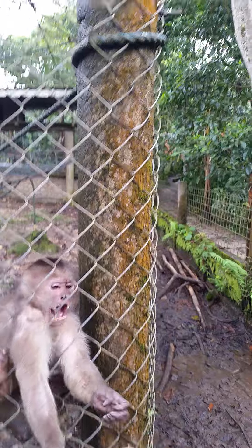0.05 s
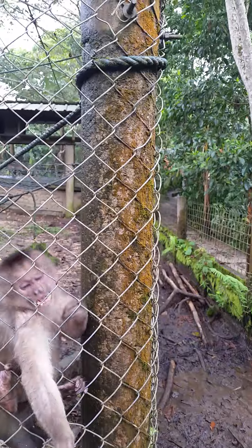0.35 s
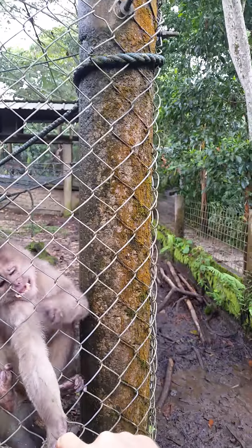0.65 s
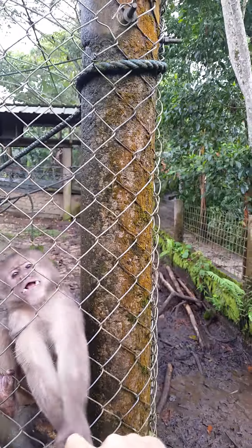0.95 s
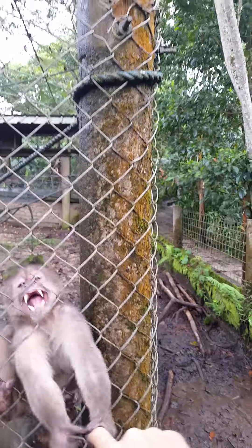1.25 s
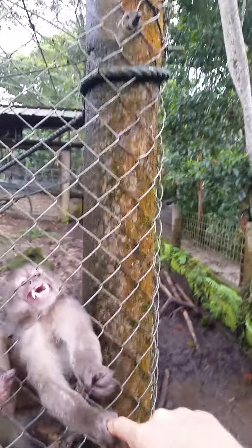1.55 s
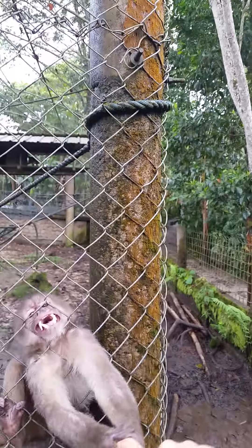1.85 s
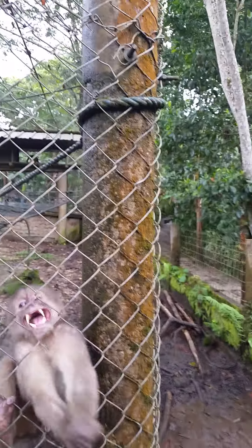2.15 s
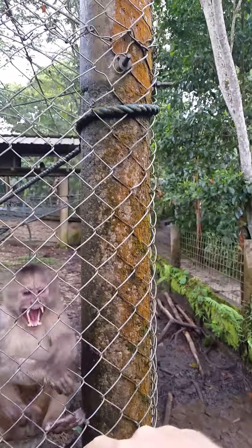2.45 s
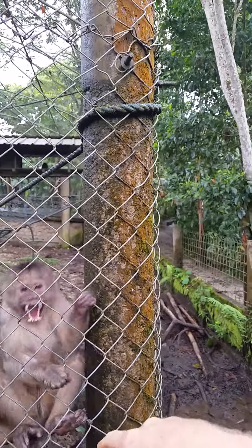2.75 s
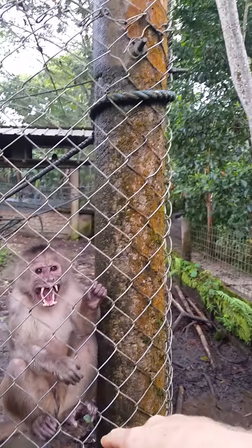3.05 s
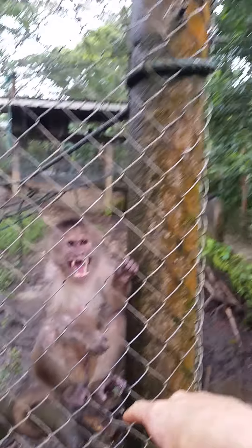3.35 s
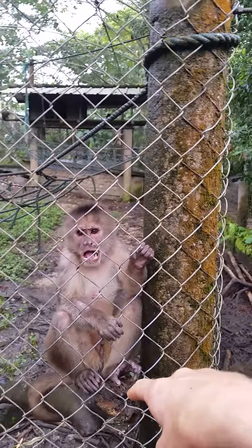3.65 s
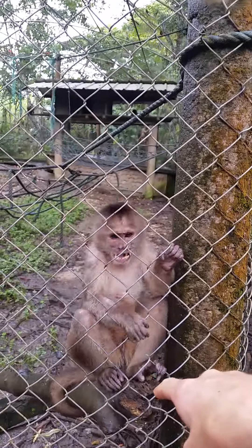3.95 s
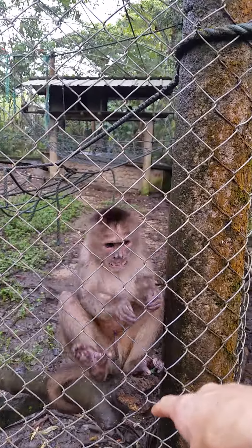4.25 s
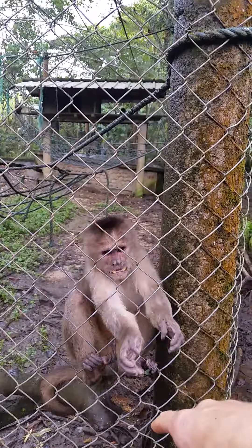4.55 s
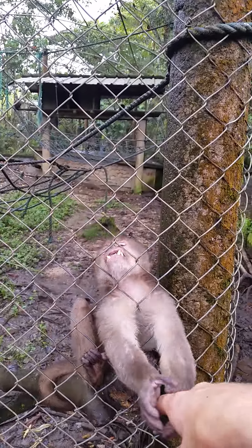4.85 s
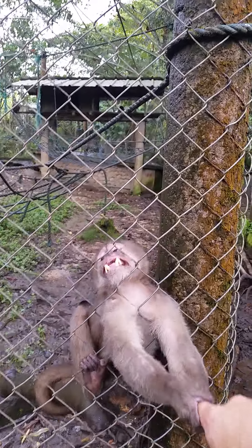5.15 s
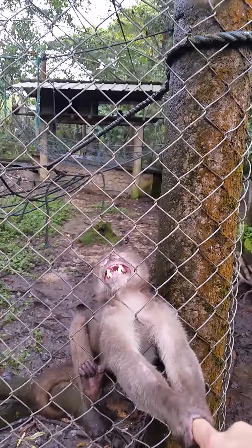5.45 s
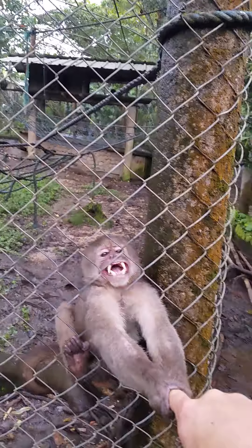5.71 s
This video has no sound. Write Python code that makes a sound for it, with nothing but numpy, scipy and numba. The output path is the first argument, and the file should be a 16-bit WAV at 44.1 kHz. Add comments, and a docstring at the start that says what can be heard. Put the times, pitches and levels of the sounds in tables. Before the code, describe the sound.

A monkey calls close to the microphone from behind a wire fence, outdoors, with a slight echo over a quiet hush and faint hum. It starts with thin, strained whines and hoarse, hissing screams until 0.5 seconds, and again around 1 second. Two short, loud barks come at about 1.4 and 1.55 seconds. Soft rustling and a little low wind rumble lead into a stronger scream from 2.1 to 2.6 seconds. Four sharp, high squeaks follow between 2.6 and 3.2 seconds, mixed with gritty scuffs and dull bumps at the fence and another scream. Softer screams come near 3.9 and 4.5 seconds, with thin, wavering whines running on to about 5.1 seconds. A harsh scream and a quieter bark around 5.2 seconds lead to one clear yelp, rising and falling, at 5.4 seconds. Brief high whines follow, and another scream begins near 5.8 seconds.

```python
"""A thin whine breaks into hoarse, hissing screams: a capuchin monkey close by, behind a wire fence.
Short barks, high squeaks and a yelp come between. Its vocal folds slap chaotically in the screams
and vibrate at a gliding pitch in the other calls; throat and mouth colour the sound.
It scuffles at the fence. Shelters and trees echo it over an outdoor hush and a faint hum."""
import sys
import numpy as np
from scipy import signal
from scipy.fft import rfft, irfft, next_fast_len
from scipy.io import wavfile
from scipy.ndimage import uniform_filter1d
from numba import njit

SR = 44100
rng = np.random.default_rng(int(sys.argv[2]) if len(sys.argv) > 2 else 0)


def int16_out(signal):
    """Quantize to a 16-bit WAV file."""
    q = np.round(np.clip(np.atleast_2d(signal).T, -1, 1) * 32767)
    wavfile.write(sys.argv[1], SR, q.astype(np.int16))


N = 263629
T = np.arange(N) / SR
TOP_HZ = 14600
WAVER_PER_S = 50  # trembling of the strained throat

# open throat of barks and yelp: f/Hz, gain/dB
OPEN_THROAT = [(700, -15), (1250, 2), (1600, -.5), (2300, 0), (2750, -7), (3700, 1), (5700, 0), (8000, -19),
               (11000, -38)]


def undb(db):
    return 10 ** (np.asarray(db) / 20)


def unit(x):
    """Scale to rms 1."""
    return x / np.sqrt(np.mean(x ** 2))


def shape(x, colour):
    """Filter by a colour table: f/Hz, gain/dB."""
    size = next_fast_len(len(x) + 2048)
    bins_hz = np.maximum(np.fft.rfftfreq(size, 1 / SR), 1)
    points_hz, points_db = np.transpose(colour)
    gain = undb(np.interp(np.log(bins_hz), np.log(points_hz), points_db))
    return irfft(rfft(x, size) * gain, size)[:len(x)]


def noise(colour):
    return unit(shape(rng.standard_normal(N), colour))


def wander(per_s, t=T):
    """Random curve through per_s values a second; spread near 1."""
    values = rng.standard_normal(len(t) // 10 + 2)
    return np.interp((t - t[0]) * per_s, np.arange(len(values)), values)


def jumps(per_s, t):
    """Random held value that jumps about per_s times a second."""
    held = np.cumsum(rng.random(len(t)) < per_s / SR)
    return rng.standard_normal(len(t) + 1)[held]


def arch(t, start, turn, end, curve):
    """0 at the turn, 1 at both ends; curve 1 is pointed, 2 parabolic."""
    return np.interp(t, [start, turn, end], [1, 0, 1]) ** curve


@njit
def resonate(x, hz, width_hz):
    """State-variable band-pass with a moving centre."""
    y = np.empty(len(x))
    band_state, low_state = 0., 0.
    for i in range(len(x)):
        g, damping = np.tan(np.pi * hz[i] / SR), width_hz / hz[i]
        band = (band_state + g * (x[i] - low_state)) / (1 + g * (g + damping))
        band_state = 2 * band - band_state
        low_state += 2 * g * band
        y[i] = damping * band
    return y


def background(hum_hz=108, hum_db=-60):
    """Open-air hush, a wavering far hum, and wind and handling rumble at the microphone."""
    # spectra: f/Hz, gain/dB
    hush_colour = [(25, -10), (90, 5.5), (250, -3.5), (2500, -14), (8000, -15.5), (10000, -33)]
    rumble_colour = [(70, -17.5), (600, -65)]
    # the phone's gain ducks the hush and lets it recover: t/s, gain/dB
    recorder_gain_db = [(0, 6), (.7, -1.5), (1.2, 6.5), (2.6, 6), (3.5, -4.5), (4.4, 3), (5.9, 3)]
    # t/s, level/dB
    rumble_swell = [(1.65, -79), (1.8, -52.5), (2.18, -44.5), (2.3, -73)]
    hush_db = -55 + np.interp(T, *np.transpose(recorder_gain_db))
    hush = noise(hush_colour) * undb(hush_db + .5 * wander(1.3))
    hum_phase = 2 * np.pi * np.cumsum(hum_hz + 2 * wander(28)) / SR
    hum = np.sin(hum_phase) * undb(hum_db + 2 * wander(8.2))
    rumble = noise(rumble_colour) * undb(np.interp(T, *np.transpose(rumble_swell)) + 2 * wander(22))
    return hush + hum + rumble


def pitched_calls(rows, throat, *, ends_db, db_per_octave, attack_s, release_s, jitter, jitter_per_s,
                  crack, doubling, rasp, mouth_db, tremor_db=5, soft_hz=9000):
    """Vibrating folds glide in pitch, loudest at the turn, and grow rougher through each call."""
    out = np.zeros(N)
    harmonic = np.arange(1, 19)[:, None]
    lag_rad = harmonic ** 2 / (2 * np.pi)  # gives each pulse a short ring
    mouth_octaves = .54
    for start, turn, end, start_hz, turn_hz, end_hz, db, roughness, mouth_hz in rows:
        span = (T >= start) & (T <= end)
        t = T[span]
        away = arch(t, start, turn, end, curve=1.7)
        octaves = np.log2(np.where(t < turn, start_hz, end_hz) / turn_hz) * away
        hz = turn_hz * 2 ** octaves
        drop_db = ends_db * away + db_per_octave * np.abs(octaves)
        rough = roughness * np.interp(t, [start, end], [.12, 1]) ** .8
        waver = wander(jitter_per_s, t) + .5 * wander(69.9, t)
        detune = rough * (jitter * waver + crack * jumps(70, t))  # the strained voice shakes and cracks
        phase = 2 * np.pi * np.cumsum(hz * (1 + detune)) / SR
        partial_hz = harmonic * hz
        boost_db = mouth_db * np.exp(-(np.log2(partial_hz / mouth_hz) / mouth_octaves) ** 2)
        # folds close more gently in soft parts, so treble fades first
        strength = undb(boost_db - drop_db * partial_hz / soft_hz) * (partial_hz < TOP_HZ)
        folds = (strength * np.cos(harmonic * phase - lag_rad)).sum(0)
        folds /= np.sqrt((strength ** 2).sum(0) / 2)
        alternate_cycles = 1 + doubling * rough * (1 - away) * np.cos(phase / 2)
        breath = rasp * rough * rng.standard_normal(len(t))
        voice = shape(folds * alternate_cycles + breath, throat)
        voice /= np.sqrt(uniform_filter1d(voice ** 2, size=440))
        ramp = np.clip(np.minimum((t - start) / attack_s, (end - t) / release_s), 0, 1)
        level_db = db - drop_db + tremor_db * rough * wander(110, t)
        out[span] += voice * undb(level_db) * np.sin(np.pi / 2 * ramp) ** 2
    return out


def whines():
    """Thin, strained tones in and around the screams."""
    # start/s, turn/s, end/s, start/Hz, turn/Hz, end/Hz, level/dB, roughness/0-1, mouth/Hz
    glides = [ (-.03, .01, .13, 1550, 1459, 1417, -36.5, 0.59, 1900),
              (.11, .23, .42, 1498, 1668, 1460, -37, 0.78, 2300),
              (.41, .44, .5, 1510, 1470, 1100, -40.5, 0.3, 1410),
              (.12, .16, .25, 2640, 2595, 2596, -34.5, 0.16, 2620),
              (.78, .85, .87, 1490, 1640, 1900, -43, 0.22, 4930),
              (.86, .885, .9, 1860, 2050, 2030, -41, 0.26, 2100),
              (.892, .92, 1.16, 1432, 1480, 1935, -36.5, 0.87, 1970),
              (2.03, 2.085, 2.16, 986, 1163, 1420, -34.5, 0.57, 1920),
              (2.83, 2.84, 2.875, 1866, 1900, 2070, -34.5, 0.58, 1890),
              (3.55, 3.60, 3.65, 1503, 1180, 1117, -47, 0.8, 1620),
              (3.615, 3.73, 3.79, 702, 721, 796, -45, 0.84, 1800),
              (4.28, 4.305, 4.342, 2355, 2450, 1850, -46, 0.27, 4730),
              (4.33, 4.345, 4.4, 1850, 1977, 2330, -41, 0.68, 4270),
              (4.405, 4.47, 4.5, 2030, 1446, 1507, -32, 0.25, 3100),
              (4.495, 4.525, 4.59, 794.6, 837, 802, -32, 0.31, 3900),
              (4.68, 4.845, 4.96, 1890, 2398, 2374, -41.5, 0.33, 2400),
              (4.935, 4.968, 4.985, 2940, 2690, 2520, -37.5, 0.4, 5500),
              (4.968, 4.99, 5.02, 2600, 1936, 1950, -44, 0.63, 4210),
              (5.01, 5.04, 5.07, 2450, 2411, 2400, -36.5, 0.64, 4700),
              (5.05, 5.065, 5.12, 3106, 3000, 2760, -31.5, 0.72, 5500),
              (5.686, 5.704, 5.742, 3024, 2856, 2440, -30, 0.35, 3000),
              (5.715, 5.755, 5.8, 2180, 2046, 2220, -42.5, 0.77, 4100),
              (5.746, 5.76, 5.81, 2860, 2974, 2740, -29, 0.25, 2970),
              (5.777, 5.795, 5.86, 2530, 2386, 2190, -40.5, 0.43, 4550)]
    # f/Hz, gain/dB
    throat = [(800, -26), (1150, -13), (1550, -9), (2900, 2), (4000, -6), (4900, -13), (6000, -21),
              (9000, -44)]
    return pitched_calls(glides, throat, ends_db=9.7, db_per_octave=1.4, attack_s=.0036, release_s=.0029,
                         jitter=.085, jitter_per_s=600, crack=.045, doubling=.5, rasp=.6,
                         mouth_db=7, soft_hz=20000)


def resonance_centres(rows, octaves_per_db=.018):
    """Low and upper throat resonance in Hz; the low one follows the hiss as the mouth opens."""
    points = []
    for start, _, end, _, low_hz, _, upper_hz, start_hiss_db, end_hiss_db in rows:
        rise = 2 ** (octaves_per_db * (end_hiss_db - start_hiss_db) / 2)
        points += [(start, low_hz / rise, upper_hz), (end, low_hz * rise, upper_hz)]
    times, low, upper = np.transpose(sorted(points))
    return np.interp(T, times, low), np.interp(T, times, upper)


def throat_ring(x, hz, width_hz):
    """Steep throat resonance whose centre trembles with strain."""
    centre_hz = hz * np.exp(.06 * wander(WAVER_PER_S))
    return unit(resonate(resonate(x, centre_hz, width_hz), centre_hz, width_hz))


def screams(fold_hz=1100, chaos=.35, air=.11, swell_db_per_s=53.5, sag_db=7, fade_s=.02):
    """Folds slap at chaotic intervals and, with rushing air, excite the throat's resonances."""
    # start/s, peak/s, end/s, level/dB, low ring/Hz, low ring/dB, upper ring/Hz, start hiss/dB, end hiss/dB
    cries = [ (0.05, 0.173, 0.34, -35.5, 1592, -9.5, 3250, -14.5, -11.5),
             (0.365, 0.427, 0.53, -39.5, 1760, -8.5, 3470, -13, -12.5),
             (0.90, 1.091, 1.185, -34.5, 1660, -11.5, 3220, -26, -4.5),
             (1.577, 1.667, 1.68, -37, 2253, -6.5, 3070, -17, -13),
             (2.10, 2.382, 2.567, -28, 1917, -2, 3440, -12, -14.5),
             (2.917, 3.045, 3.304, -35, 1757, -0.5, 3063, -27.5, -31),
             (3.63, 3.89, 3.974, -36, 2078, -3, 3315, -19.5, -8.5),
             (4.379, 4.53, 4.58, -39, 2540, -3, 3600, -3.5, -6),
             (5.057, 5.31, 5.37, -29.5, 1810, -16, 3510, -0.5, -16.5),
             (5.825, 5.967, 6.64, -30, 1830, -14, 3616, -8.5, -12.5)]
    # throat colours: f/Hz, gain/dB
    body_colour = [(900, -65.5), (2000, -3.5), (2500, 9), (3500, 4), (4500, -5), (8000, -99)]
    hiss_colour = [(2500, -21), (4600, 5), (6800, -1), (8000, -10), (11000, -38)]
    cycles = np.cumsum(fold_hz * np.exp(chaos * wander(fold_hz))) / SR
    slaps = np.diff(np.floor(cycles), prepend=0)
    source = unit(slaps - slaps.mean()) + air * rng.standard_normal(N)
    spurts_db = 2.4 * np.minimum(wander(330), 1)
    source *= undb(spurts_db + wander(WAVER_PER_S))
    low_hz, upper_hz = resonance_centres(cries)
    low_ring = throat_ring(source, low_hz, width_hz=580.)
    upper_ring = throat_ring(source, upper_hz, width_hz=650.)
    body = undb(.5) * unit(shape(source, body_colour)) + undb(-4) * upper_ring
    hiss = unit(shape(source, hiss_colour))
    out = np.zeros(N)
    for start, peak, end, db, _, ring_db, _, start_hiss_db, end_hiss_db in cries:
        span = (T > start - .1) & (T < end + .1)
        t = T[span]
        ends_db = np.where(t < peak, swell_db_per_s * (peak - start), sag_db)
        drop_db = ends_db * arch(t, start, peak, end, curve=2)
        gate = np.exp(-np.abs(t - np.clip(t, start, end)) / fade_s)
        opening = undb(np.interp(t, [start, end], [start_hiss_db, end_hiss_db]))
        voice = body[span] + undb(ring_db) * low_ring[span] + opening * hiss[span]
        out[span] += undb(db - drop_db) * gate * voice
    return out


def barks():
    """Short, low calls through an open throat."""
    # start/s, turn/s, end/s, start/Hz, turn/Hz, end/Hz, level/dB, roughness/0-1, mouth/Hz
    glides = [ (1.371, 1.399, 1.431, 546, 697, 664, -20, 0.67, 3330),
              (1.517, 1.555, 1.606, 731, 767.8, 740, -20.5, 0.09, 2180),
              (5.183, 5.24, 5.28, 516, 682, 604, -31, 0.36, 1880)]
    return pitched_calls(glides, OPEN_THROAT, ends_db=7, db_per_octave=0, attack_s=.012, release_s=.011,
                         jitter=.075, jitter_per_s=900, crack=.03, doubling=.9, rasp=.45,
                         mouth_db=8, tremor_db=3, soft_hz=4000)


def blow(at_s, decay_s, attack_s=.002):
    """Impact envelope peaking at at_s."""
    return np.exp(-np.maximum((at_s - T) / attack_s, (T - at_s) / decay_s))


def scuffles(bump_width_hz=75.):
    """Hands and feet work at fence and ground: soft rustles, gritty scuffs, dull bumps."""
    # t/s, level/dB, half length/s
    rustles = [(1.81, -45, 0.075), (2, -49, 0.021), (2.25, -47, 0.075), (5.6, -50.5, 0.04)]
    # t/s, level/dB, decay/s
    scuffs = [(2.619, -37.5, 0.013), (2.821, -42.5, 0.008), (2.891, -38, 0.016), (2.925, -25.5, 0.0102)]
    # t/s, level/dB, resonance/Hz
    bumps = [(2.622, -47, 340), (2.826, -45, 360), (2.928, -42, 400), (2.932, -37, 880), (5.889, -37, 200)]
    # spectra: f/Hz, gain/dB
    rustle_colour = [(3500, 6), (8000, -6), (11000, 0), (14000, -12)]
    scrape_colour = [(200, -29), (1150, 16.5), (3200, 7.5), (4300, 6), (10500, 4), (14000, -5)]
    scrape = noise(scrape_colour) * undb(3 * wander(600))
    swells = sum(undb(db) * np.exp(-((T - at_s) / half_s) ** 2) for at_s, db, half_s in rustles)
    out = noise(rustle_colour) * undb(wander(160)) * swells
    for at_s, db, decay_s in scuffs:
        out += undb(db) * blow(at_s, decay_s) * scrape
    for at_s, db, hz in bumps:
        thud = unit(resonate(rng.standard_normal(N), np.full(N, float(hz)), bump_width_hz))
        out += undb(db) * blow(at_s, decay_s=.017) * thud
    return out


def squeaks():
    """High, dry chirps: the pitch shoots up and turns."""
    # start/s, turn/s, end/s, start/Hz, turn/Hz, end/Hz, level/dB, roughness/0-1, mouth/Hz
    glides = [ (2.555, 2.584, 2.596, 1890, 3432, 3300, -14.5, 0.11, 7800),
              (2.748, 2.775, 2.791, 1425, 3620, 2880, -14.5, 0.07, 6940),
              (2.860, 2.879, 2.889, 4990, 5440, 4867, -13, 0.01, 10900),
              (3.134, 3.156, 3.168, 2253, 3787, 3420, -20.5, 0.15, 7450)]
    # f/Hz, gain/dB
    throat = [(1200, -1), (3300, 2), (7000, -8), (10600, -13.5), (13000, -18)]
    return pitched_calls(glides, throat, ends_db=3, db_per_octave=14.2, attack_s=.0023, release_s=.0035,
                         jitter=.17, jitter_per_s=1600, crack=0, doubling=.54, rasp=.5,
                         mouth_db=11, tremor_db=11)


def yelp():
    """One clear, open-throated call that rises and drops back."""
    # start/s, turn/s, end/s, start/Hz, turn/Hz, end/Hz, level/dB, roughness/0-1, mouth/Hz
    glide = [(5.345, 5.434, 5.464, 1045, 1544, 1025, -19.5, 0.11, 2100)]
    return pitched_calls(glide, OPEN_THROAT, ends_db=22, db_per_octave=18, attack_s=.005, release_s=.005,
                         jitter=.12, jitter_per_s=1200, crack=.03, doubling=.35, rasp=1.2, mouth_db=7)


def echo(x, t60_s=.57, build_s=.0012, early_s=.0073, leaf_db_per_s=90):
    """Ground and post reflect at once; shelters and trees scatter a tail whose treble dies first."""
    # f/Hz, gain/dB
    colour = [(200, 8.5), (3000, 10.5), (7000, 11), (14000, -0.5)]
    t = T[:SR]
    tail = rng.standard_normal(SR) * undb(-60 * t / t60_s) * (1 - np.exp(-t / build_s))
    dull = uniform_filter1d(tail, size=3)
    tail = dull + (tail - dull) * undb(-leaf_db_per_s * t)
    early = rng.standard_normal(SR) * np.exp(-t / early_s) * (t > .002)
    response = undb(-13) * tail / np.linalg.norm(tail) + undb(-17) * early / np.linalg.norm(early)
    return signal.fftconvolve(x, shape(response, colour))[:N]


def scene(lag_samples=10):
    """Direct sound reaches the left microphone first; echo and part of the background differ by side."""
    commotion = screams() + scuffles() + whines()
    squeaking, barking, yelping = squeaks(), barks(), yelp()
    direct = commotion + barking + yelping + squeaking
    # barks, yelp and squeaks are thrown forwards, so less of them returns
    scattered = commotion + undb(-10) * barking + undb(-21) * yelping + undb(-11) * squeaking
    shared = background()
    channels = []
    for lag in (0, lag_samples):
        delayed = np.pad(direct, (lag, 0))[:N]
        channels.append(delayed + echo(scattered) + .79 * (shared + background()))
    return np.array(channels)


def record(dry, gain_db=5):
    """Hand-held phone: the right microphone port is muffled; both sides are cut above TOP_HZ."""
    # f/Hz, gain/dB
    right_port = [(80, -3.5), (500, -12), (1300, -20.5), (8000, -28.5)]
    channels = undb(gain_db) * np.array([dry[0], shape(dry[1], right_port)])
    top_cut = signal.ellip(8, .2, 80, TOP_HZ, fs=SR, output="sos")
    return signal.sosfilt(top_cut, channels)


dry = scene()
out = record(dry)
int16_out(out)
```